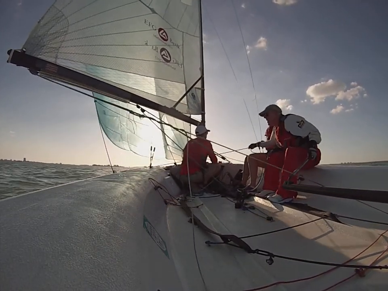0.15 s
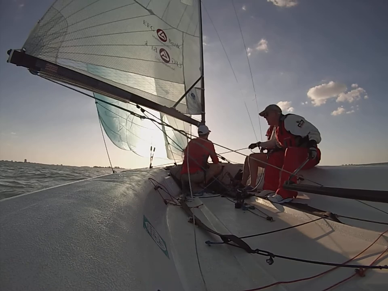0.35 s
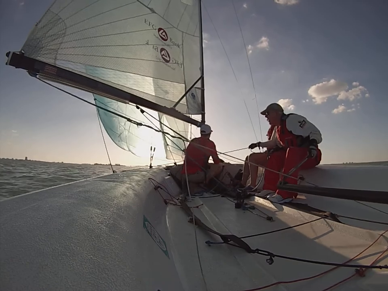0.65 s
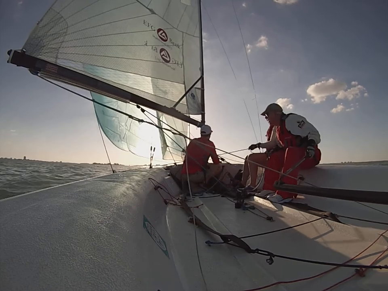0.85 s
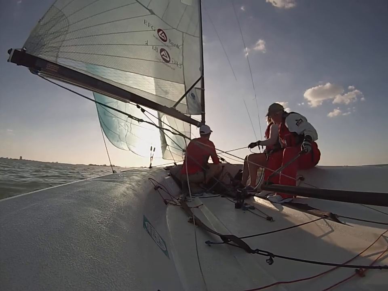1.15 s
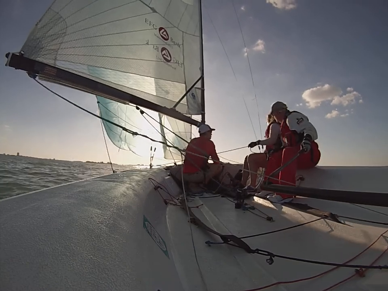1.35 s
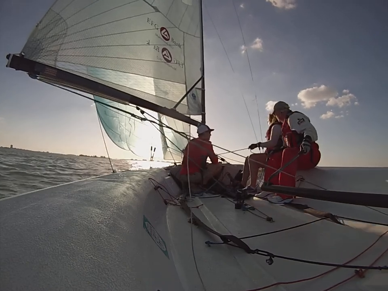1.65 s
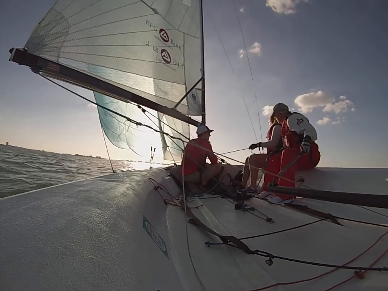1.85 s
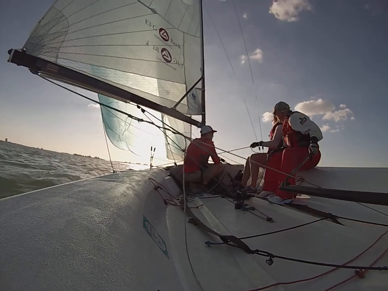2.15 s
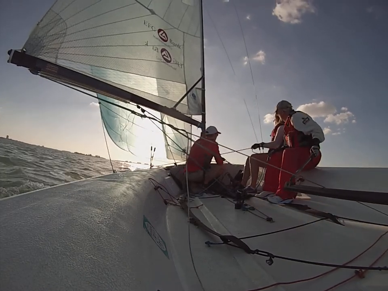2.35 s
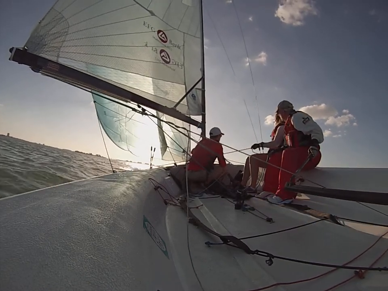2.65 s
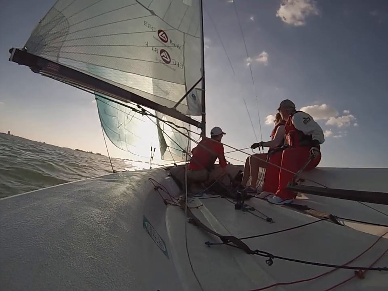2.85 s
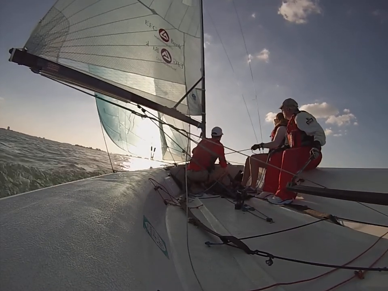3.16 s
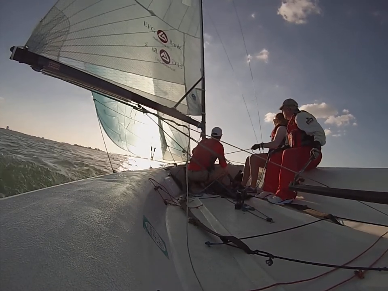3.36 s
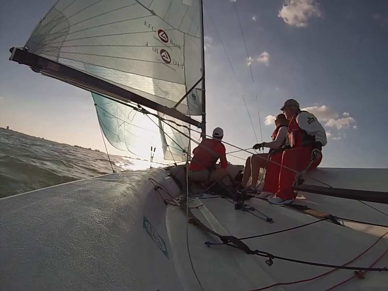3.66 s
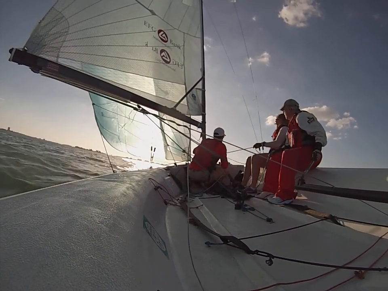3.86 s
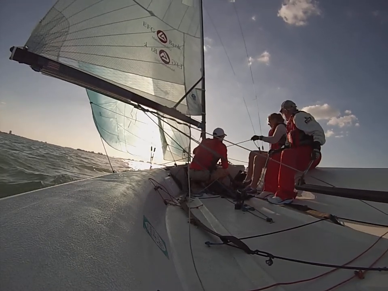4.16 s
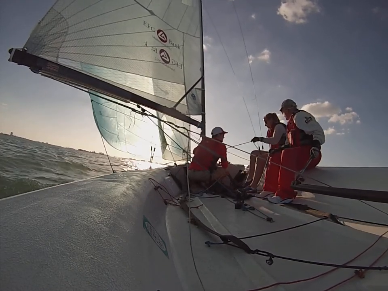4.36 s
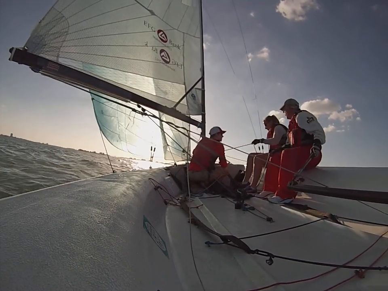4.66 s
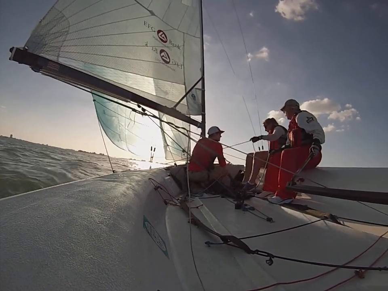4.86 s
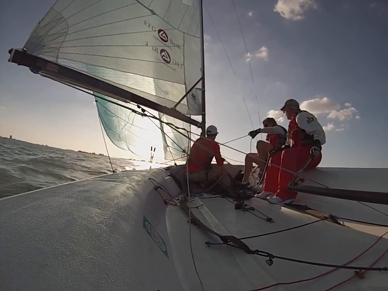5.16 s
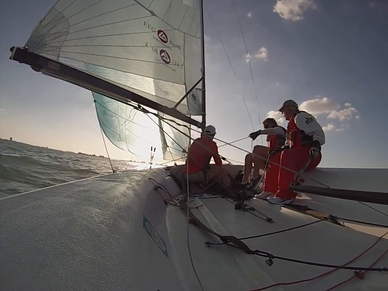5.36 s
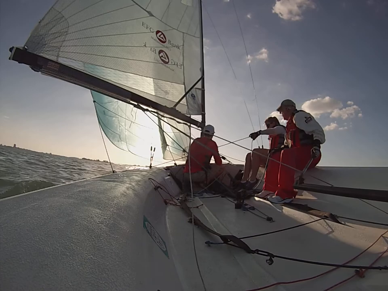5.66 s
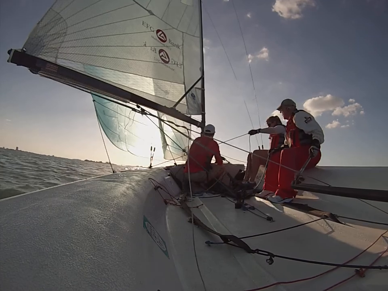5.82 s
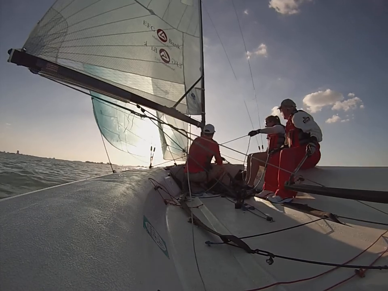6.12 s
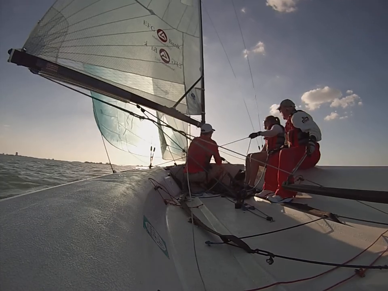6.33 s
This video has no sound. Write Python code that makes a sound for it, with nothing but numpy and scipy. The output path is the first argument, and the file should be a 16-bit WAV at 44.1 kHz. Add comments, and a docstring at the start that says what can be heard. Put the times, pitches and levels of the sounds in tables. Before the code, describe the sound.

A closed, boxy microphone on a sailboat's stern deck picks up low hollow hull booms, gurgling wake and fine spray. Bubbles plop throughout. Slaps are gentle at first, then sharper with hard knocks from just after two seconds and a heavy slap with thumps past three. Wind rumble peaks shortly after five seconds, followed by another thump and a bright, crisp slap at six.

```python
"""A small sailboat runs through choppy water, heard from a closed case mounted on its stern deck.
From the start the hull hums (noise in its modes) and booms (a wandering sine); water gurgles and rushes past,
spray ticks (bubble rings, noise), bubbles plop (sagging notes), and wind rumbles in gusts (coloured noise).
Slaps (bursts of noise and grains), drops (pinged noise) and two faint squeaks (wavering tones) join in; knocks
(struck panel modes) land from 2.2 s, thumps (pushed hull modes) from 3.3 s, and the strongest gust at 5.3 s."""
import sys
import numpy as np
from scipy import signal
from scipy.fft import rfft, irfft, next_fast_len
from scipy.io import wavfile
from scipy.ndimage import uniform_filter1d

SR = 44100
rng = np.random.default_rng(int(sys.argv[2]) if len(sys.argv) > 2 else 0)


def unload_wav(signal):
    """Save mono or channel-first audio to the path in sys.argv[1] as 16-bit WAV at rate SR, clipped to [-1, 1]."""
    wavfile.write(
        sys.argv[1],
        SR,
        np.round(np.clip(np.atleast_2d(signal).T, -1, 1) * 32767).astype(np.int16),
    )


N = 286209
TIME = np.arange(N) / SR

# hull modes: pitch_hz, width_hz, relative level_db
HULL_MODES = [(46.5, 37, -17), (101, 49, -10), (122, 16.6, 3.5), (133.3, 14, -7), (177, 37, -19)]
# waves passing under the hull: crest_s, half_length_s, gurgle_db
PASSING_WAVES = [(.898, 0.17, -52), (1.46, 0.2, -46.5), (1.896, 0.22, -44.5), (2.539, 0.45, -50),
                 (3.278, 0.19, -48.5), (4.21, 0.28, -50), (4.674, 0.36, -43), (5.236, 0.065, -43),
                 (5.518, 0.067, -45.5), (5.838, 0.21, -42.5), (6.288, 0.23, -46)]
CALM_GURGLE_DB = -51  # between the waves


def from_db(db):
    """Decibels to gain."""
    return 10 ** (np.asarray(db) / 20)


def rms_one(x):
    """Scale to rms 1."""
    return x / np.sqrt(np.mean(x ** 2) + 1e-20)


def in_time(rows):
    """The columns of a curve table at every sample."""
    s, *columns = np.transpose(rows)
    return [np.interp(TIME, s, column) for column in columns]


def drift(corner_hz):
    """Slow random wander of rms 1: noise through two equal poles."""
    step = 40  # samples per slow sample
    r = np.exp(-2 * np.pi * corner_hz * step / SR)
    noise = rng.standard_normal(N // step + 2002)
    slow = signal.lfilter([1], [1, -2 * r, r * r], noise)[2000:]  # settled part
    return np.interp(np.arange(N) / step, np.arange(len(slow)), rms_one(slow))


def band(x, low_hz, high_hz, order=2):
    """Causal band-pass."""
    high_hz = np.clip(high_hz, low_hz + 10, SR / 2 - 10)
    sos = signal.butter(order, [low_hz, high_hz], "band", fs=SR, output="sos")
    return signal.sosfilt(sos, x + 1e-18)


def ring(clicks, hz, t60_s):
    """A unit click sets a decaying sine of initial height 1 ringing."""
    r = np.exp(-np.log(1000) / (t60_s * SR))
    w = 2 * np.pi * hz / SR
    return signal.lfilter([0, np.sin(w)], [1, -2 * r * np.cos(w), r * r], clicks + 1e-18)


def resonate(x, hz, width_hz):
    """A resonance with gain 1 on top."""
    r = np.exp(-np.pi * width_hz / SR)
    zeros = np.array([1, 0, -1]) * (1 - r * r) / 2
    poles = [1, -2 * r * np.cos(2 * np.pi * hz / SR), r * r]
    return signal.lfilter(zeros, poles, x + 1e-18)


def colour(x, spectrum):
    """Impose a spectrum, interpolated over log frequency."""
    hz, db = np.transpose(spectrum)
    size = next_fast_len(N)
    bins_hz = np.maximum(np.fft.rfftfreq(size, 1 / SR), 1)
    gain = from_db(np.interp(np.log(bins_hz), np.log(hz), db, -100, -100))
    return irfft(rfft(x, size) * gain, size)[:N]


def case(x):
    """The walls of the case stress their resonances and thin out the hollows between."""
    # pitch_hz, width_hz (before scaling by boost), boost_db (negative: hollow)
    case_modes = [(795, 85, 6), (1178, 70, 8), (1270, 70, -3), (1440, 260, 4), (1660, 110, -3),
                  (1915, 170, 8.5), (2190, 110, -4), (2335, 80, 6), (2490, 70, -3), (2610, 80, 5),
                  (2980, 130, 6), (3490, 100, 4), (3980, 200, 4), (5100, 400, 4), (6620, 380, 5)]
    for hz, width_hz, boost_db in case_modes:
        x = x + (from_db(boost_db) - 1) * resonate(x, hz, width_hz / from_db(boost_db / 2))
    return x


def grains(per_s, spread_db):
    """Random clicks of either sign, many small and few large."""
    at = np.flatnonzero(rng.random(N) < per_s / SR)
    size_db = spread_db * np.minimum(rng.exponential(1, len(at)), 4)
    clicks = np.zeros(N)
    clicks[at] = from_db(size_db) * rng.choice([-1, 1], len(at))
    return clicks


def bubbles(clicks, low_hz, high_hz, cycles, count=24):
    """Each click rings a bubble of random size, for a set number of cycles to -60 dB; rms 1."""
    size_class = rng.integers(0, count, N)
    out = np.zeros(N)
    for k, hz in enumerate(np.geomspace(low_hz, high_hz, count)):
        out += np.sqrt(hz) * ring(clicks * (size_class == k), hz, cycles / hz)
    return rms_one(out)


def swell(crest_s, rise_s, decay_s):
    """A rounded rise to 1 and an exponential fall."""
    t = TIME - crest_s
    return np.exp(-np.minimum(np.where(t < 0, (t / rise_s) ** 2, t / decay_s), 40))


def crests(calm_db, rows):
    """Gain: a calm level, plus in power a rounded hump per (crest_s, half_length_s, level_db)."""
    power = from_db(calm_db) ** 2
    for s, half_s, db in rows:
        power = power + from_db(db) ** 2 * np.exp(-2 * ((TIME - s) / half_s) ** 2)
    return np.sqrt(power)


def blips(rows, sag=0.028):
    """Air pockets pinch off: each a short note that swells, sags in pitch and dies."""
    out = np.zeros(N)
    for s, hz, peak_db, length_s in rows:
        first = max(int((s - length_s) * SR), 0)
        last = min(int((s + 6 * length_s) * SR), N)
        at = np.arange(first, last)
        age = (at / SR - s) / length_s
        phase = 2 * np.pi * np.cumsum(hz * (1 - sag * np.tanh(age))) / SR
        shape = np.exp(-np.where(age < 0, (2.7 * age) ** 2, np.hypot(age, .5) - .5))
        out[at] += from_db(peak_db) * np.sin(phase) * shape
    return out


def wake_blips(per_s, spread_db, length_s):
    """Blips at random times, 850-3060 Hz, of 0.5-1.5 times the given length; rms 1."""
    when, pitch, size, length = rng.random((int(per_s * N / SR), 4)).T
    peak_s = when * N / SR
    pitch_hz = 850 * 3.6 ** pitch
    return rms_one(blips(np.column_stack([peak_s, pitch_hz, spread_db * size, length_s * (.5 + length)])))


def booms():
    """Each wave swells the hull's main note, whose pitch shifts with how the hull sits in the water."""
    # crest_s, half_length_s, level_db (rms)
    boom_crests = [(0.002, 0.042, -22.5), (0.232, 0.056, -24.5), (0.332, 0.06, -21), (0.492, 0.1, -18),
                   (0.588, 0.043, -20), (0.676, 0.09, -25.5), (1.021, 0.022, -27.5), (1.163, 0.065, -29),
                   (1.27, 0.046, -29.5), (1.435, 0.018, -19.5), (1.48, 0.013, -21.5), (1.763, .022, -29.5),
                   (1.825, 0.012, -21.5), (1.884, 0.015, -25.5), (1.992, 0.02, -18), (2.268, 0.016, -25),
                   (2.367, 0.031, -25), (2.539, 0.011, -23.5), (2.632, 0.02, -25), (2.853, 0.013, -24.5),
                   (2.915, .018, -23.5), (3.02, 0.022, -26.5), (3.197, 0.0095, -26.5), (3.438, 0.045, -30),
                   (3.665, 0.017, -25), (3.773, 0.051, -27.5), (4.058, 0.048, -25.5), (4.201, 0.052, -25.5),
                   (4.273, 0.017, -21.5), (4.326, 0.021, -20), (4.546, 0.017, -18.5), (4.626, 0.026, -20.5),
                   (4.704, 0.08, -21), (4.808, 0.04, -21), (4.989, 0.047, -21.5), (5.766, 0.035, -18),
                   (5.941, 0.036, -26.5), (6, 0.048, -25.5), (6.111, 0.035, -26.5), (6.311, 0.031, -22),
                   (6.395, 0.018, -25)]
    # time_s, pitch_hz
    pitch_curve = [(0.4, 119.3), (1.4, 122), (1.85, 126.5), (2.0, 138.3), (2.25, 122), (3.75, 125.2),
                   (4.25, 118), (4.8, 123), (5.0, 128), (5.85, 132), (6.3, 122)]
    waver_hz, waver_db = 3.46, 0.5  # rms
    pitch_hz, = in_time(pitch_curve)
    phase = 2 * np.pi * np.cumsum(pitch_hz + waver_hz * drift(8.35)) / SR
    tone = np.sqrt(2) * np.sin(phase)
    return tone * crests(-np.inf, boom_crests) * from_db(waver_db * drift(17))


def thumps():
    """A wave pounding the bottom pushes the hull softly; the water damps its modes quickly."""
    # start_s, push level_db
    pounding = [(3.337, -15.5), (3.368, -19.5), (5.187, -10), (5.2271, -9.5), (5.285, -16.5), (5.315, -18),
                (5.353, -18.5), (5.80, -6.5), (5.827, -13)]
    pushes = np.zeros(N)
    for s, level_db in pounding:
        pushes[round(s * SR)] = from_db(level_db)
    # modes differ by half their tabled dB
    rung = sum(from_db(db / 2) * ring(pushes, hz, t60_s=0.056) for hz, _, db in HULL_MODES)
    return band(rung, 97, 171.6)


def drone():
    """Turbulent water keeps the hull's low modes murmuring, a little more as a wave passes."""
    calm_drone_db = -34
    follow_share = 0.83  # dB of drone per dB of gurgle swing
    hum = np.zeros(N)
    for hz, width_hz, db in HULL_MODES:
        narrow = resonate(rng.standard_normal(N), hz, width_hz)
        hum += from_db(db) * rms_one(resonate(narrow, hz, 4 * width_hz))
    # level the hum over 80 ms before the waves shape it
    strength = np.sqrt(uniform_filter1d(hum ** 2, int(.08 * SR)) + 1e-12)
    heave = crests(CALM_GURGLE_DB, PASSING_WAVES) / from_db(CALM_GURGLE_DB)
    return hum / strength * from_db(calm_drone_db) * heave ** follow_share


def water():
    """Gurgling under the stern, bubbles in the wake and fine spray, all churned by the same eddies."""
    # time_s, rush_db, spray_db (before a 1.54 dB lift)
    flow = [(0.0, -50.5, -64), (0.54, -52, -68.5), (0.96, -50.5, -65.5), (1.61, -50.5, -68.5),
            (2.49, -47.5, -65.5), (2.96, -49.5, -67.5), (3.25, -47.5, -63), (3.47, -51, -67.5),
            (3.74, -49, -66.5), (4.07, -48.5, -64), (5.46, -46.5, -65.5), (5.75, -49, -65.5),
            (6.14, -46.5, -64), (6.49, -49, -65)]
    # spectra: pitch_hz, relative level_db per Hz
    gurgle_spectrum = [(110, -39.5), (170, -5.5), (205, 5), (255, -4), (315, 5), (400, -4), (470, 0),
                       (600, -12.5), (1000, -35.5)]
    rush_spectrum = [(350, -17.5), (620, 0), (800, -1), (1000, -5.5), (1500, 1), (1950, 0.5), (2200, -4),
                     (3000, -10.5), (3600, -32.5), (7000, -51.5)]
    spray_spectrum = [(1800, -34), (3300, 0.5), (4200, 0.5), (5200, -4), (5700, -7), (8500, -7.5),
                      (10000, -12.5), (14500, -11)]
    rush_db, spray_db = in_time(flow)
    heave = crests(CALM_GURGLE_DB, PASSING_WAVES)
    eddies = drift(19.3)

    gurgle = bubbles(grains(500, spread_db=3.5), 179.0, 659, cycles=11.4)
    gurgle += from_db(15) * rng.standard_normal(N)
    gurgle = rms_one(colour(gurgle, gurgle_spectrum))

    rush = bubbles(grains(700, spread_db=1.5), 632, 3440, cycles=11)
    rush += from_db(-2.5) * wake_blips(per_s=120, spread_db=3, length_s=0.002602)
    rush += from_db(10.0) * rng.standard_normal(N)
    rush = rms_one(case(colour(rush, rush_spectrum)))

    # tick rate: about 600 per s at mean spray, rising 1.5 dB per dB
    ticks_per_s = 600 * from_db(1.5 * (spray_db - spray_db.mean()) + 4 * drift(30))
    ticks = bubbles(grains(ticks_per_s, spread_db=4.5), 3210, 10000, cycles=26)
    spray = ticks * from_db(-6.0) + rng.standard_normal(N)
    spray = rms_one(case(colour(spray, spray_spectrum)))

    return (gurgle * heave * from_db(2.94 * eddies)
            + rush * from_db(rush_db + 1.0 * eddies)
            + spray * from_db(spray_db + 1.54 + .5 * eddies))


def slaps():
    """A wave folds against the side: a bright splash of collapsing air pockets, then a lower gulp."""
    # splash crest_s, splash_db, gulp_db, splash decay_s, splash top_hz, gulp centre_hz
    folding_waves = [(.435, -44.5, -48, 0.047, 2140, 492), (1.222, -57.5, -35.5, 0.04, 910, 450),
                     (1.405, -48, -42.5, 0.085, 2370, 302), (1.985, -50, -45, 0.03, 1700, 480),
                     (2.25, -40, -58, 0.0099, 2530, 507), (2.33, -43, -62, 0.01, 2539, 500),
                     (2.40, -49, -49.5, 0.069, 1500, 477), (3.121, -42, -36.5, 0.0086, 1930, 400),
                     (3.138, -38, -33, 0.018, 1730, 320), (3.25, -47.5, -51, 0.055, 2160, 324),
                     (3.326, -42, -33.5, 0.021, 1810, 218.6), (3.357, -35, -35.5, 0.016, 2069, 402),
                     (3.651, -44.5, -47, 0.018, 1900, 388), (4.087, -46, -43.5, 0.028, 1210, 357),
                     (5.782, -42, -36, 0.022, 1960, 201), (5.945, -37.5, -42.5, 0.011, 2365, 445),
                     (6.017, -28.5, -34, 0.016, 2780, 349.2), (6.057, -46.5, -63, 0.056, 2730, 343),
                     (6.235, -39, -34.5, 0.03, 1110, 205)]
    # pitch_hz, relative level_db per Hz
    splash_spectrum = [(120, 17), (340, 9.5), (480, 6), (620, -0.5), (800, -0.5), (1000, -3.5),
                       (1400, -1.5), (1900, -1.5), (3200, -4), (9000, -26.5)]
    rise_share = 0.43  # rise time / decay time
    gulp_lag_s, gulp_stretch = 0.0043, 2.05  # trapped air sounds later and longer
    splash_low_hz = 635
    gulp_spread = 1.364  # factor below and above the centre
    pockets = bubbles(grains(1200, spread_db=4.0), 299, 3140, cycles=22)
    source = rms_one(grains(1400, spread_db=4.5)) + from_db(-10) * pockets
    source += from_db(-5) * rng.standard_normal(N)
    splash = case(colour(source, splash_spectrum))
    out = np.zeros(N)
    for crest_s, splash_db, gulp_db, decay_s, top_hz, gulp_hz in folding_waves:
        hit = swell(crest_s, rise_share * decay_s, decay_s)
        gulp_decay_s = gulp_stretch * decay_s
        gulp = swell(crest_s + gulp_lag_s, rise_share * gulp_decay_s, gulp_decay_s)
        bright = band(splash * hit, splash_low_hz, top_hz, order=4)
        low = band(splash * gulp, gulp_hz / gulp_spread, gulp_hz * gulp_spread, order=4)
        for level_db, shape, burst in (splash_db, hit, bright), (gulp_db, gulp, low):
            # match the burst's energy to its envelope's
            out += from_db(level_db) * burst * np.sqrt(np.sum(shape ** 2) / np.sum(burst ** 2))
    return out


def knocks():
    """Solid water strikes the side panels; a softer contact reaches only their low modes."""
    # start_s, blow level_db, contact hardness_hz
    strikes = [(2.244, -42, 4000), (2.323, -42, 4500), (3.147, -40, 1900), (3.3244, -28.5, 1300),
               (3.337, -22, 480), (3.352, -41, 3000), (3.3697, -27.5, 700), (6.0105, -38, 2400),
               (6.015, -32, 2400)]
    # pitch_hz, relative level_db, t60_s
    panel_modes = [(353, -3.5, 0.065), (450, -12, 0.074), (833, -1.5, 0.018), (1113, -4, 0.035),
                   (1430, -7, .015), (1800, -4, 0.063), (2410, -2, 0.015)]
    blows = np.zeros(N)
    for s, level_db, hard_hz in strikes:
        click = signal.unit_impulse(N, round(s * SR)) + 1e-18
        blows += from_db(level_db) * signal.sosfilt(signal.butter(2, hard_hz, fs=SR, output="sos"), click)
    return sum(from_db(db) * ring(blows, hz, t60_s) for hz, db, t60_s in panel_modes)


def plops():
    """Single bubbles and air pockets pinch off beside the stern; smaller ones die sooner."""
    # peak time_s, pitch_hz, peak_db
    pinches = [(.008, 1454, -31.5), (.424, 1925, -41), (.566, 1900, -39), (0.979, 1474, -37.5),
               (1.193, 540, -34), (1.218, 450, -22), (1.222, 329, -23), (1.249, 464, -28.5),
               (1.269, 345, -37), (1.303, 490, -40), (1.403, 262, -31), (1.428, 370, -35),
               (1.565, 470, -36), (1.854, 1910, -36), (1.899, 800, -36), (1.993, 1610, -38.5),
               (2.06, 1450, -40), (2.449, 474, -38), (2.498, 482, -38), (2.566, 1410, -41),
               (3.136, 375, -44), (3.166, 300, -34), (3.244, 1167, -42), (3.259, 840, -40),
               (3.296, 1590, -36.5), (3.306, 880, -41), (3.364, 770, -32), (3.396, 316, -29.5),
               (3.613, 1810, -41), (3.645, 1420, -45), (3.685, 1186, -41), (3.755, 1925, -36),
               (3.772, 1730, -45), (4.09, 474, -35.5), (4.147, 1910, -38.5), (4.374, 1440, -38.5),
               (4.492, 1590, -38), (4.52, 483, -36.5), (4.644, 463, -34.5), (4.691, 510.7, -38),
               (4.903, 1801, -37), (4.924, 1425, -40), (4.984, 1110, -40), (5.109, 1940, -36.5),
               (5.78, 1425, -36), (5.944, 1378, -33.5), (6.024, 1950, -26), (6.057, 1410, -35),
               (6.062, 1930, -33), (6.222, 765, -25), (6.236, 488.8, -31.5), (6.243, 270, -28),
               (6.259, 430, -31), (6.341, 1524, -41), (6.458, 1440, -36.5)]
    ring_s, ring_hz = .0095, 354  # ring time of a bubble of this pitch
    return blips([(s, hz, peak_db, ring_s * np.sqrt(ring_hz / hz)) for s, hz, peak_db in pinches])


def drops():
    """Each of the largest spray drops is a tiny noise splash with a short ping in it."""
    # time_s (2.4 ms before the crest), nominal level_db (before a 2.5 dB cut)
    big_drops = [(.5536, -51), (3.384, -48), (3.955, -40), (4.329, -48), (4.643, -44), (5.498, -44.5),
                 (5.6096, -46), (5.861, -41), (6.021, -43)]
    pings_hz = 3560 * (1 + 0.22 * rng.standard_normal(len(big_drops)))
    patter = rng.standard_normal(N)
    out = np.zeros(N)
    for (s, level_db), hz in zip(big_drops, pings_hz):
        splash = patter * swell(s + 0.0024, rise_s=0.00088, decay_s=0.0051)
        out += from_db(level_db - 2.5) * (0.25 * splash + 6.7 * resonate(splash, hz, 280))
    return band(out, 1100, 12000, order=4)


def squeaks():
    """A fitting in the rigging slips under load: a thin wavering tone and its octave."""
    # start_s, length_s, pitch_hz, level_db of the fundamental's peak
    slips = [(1.366, 0.1, 6570, -70), (2.932, 0.1, 6490, -65)]
    waver = 1 + 0.0068 * drift(90)
    out = np.zeros(N)
    for s, length_s, hz, level_db in slips:
        phase = 2 * np.pi * np.cumsum(hz * waver) / SR
        shape = np.sqrt(np.abs(np.sin(np.pi * np.clip((TIME - s) / length_s, 0, 1))))
        out += from_db(level_db) * shape * (np.sin(phase) + from_db(-10) * np.sin(2 * phase))
    return out


def wind():
    """A steady breeze buffets the case as low noise; each gust rises quickly and dies away."""
    # peak_s, rumble_db, decay_s
    gust_rows = [(.93, -39.5, 0.13), (1.41, -34, .06), (1.74, -31.5, 0.15), (3.44, -32, 0.03),
                 (4.25, -36, 0.23), (4.87, -31, 0.074), (5.26, -25, 0.3), (5.82, -37, .15),
                 (6.25, -31, 0.052)]
    # pitch_hz, relative level_db per Hz
    rumble_spectrum = [(10, -8.5), (20, -1), (30, 3), (42, -2), (75, -3), (100, -9.5), (170, -3.5),
                       (300, -42)]
    breeze_db, gust_rise_s = -43, 0.047
    power = from_db(breeze_db) ** 2
    for s, db, decay_s in gust_rows:
        power = power + (from_db(db) * swell(s, gust_rise_s, decay_s)) ** 2
    rumble = rms_one(colour(rng.standard_normal(N), rumble_spectrum))
    return rumble * np.sqrt(power) * from_db(1.0 * drift(9.8))


def scene():
    """Hull, water, rigging and wind at one microphone."""
    hull = booms() + thumps() + drone()
    sea = water() + slaps() + knocks() + plops() + drops()
    return (hull + sea + squeaks() + wind())[None]


def record(dry):
    """The top is cut steeply above 15.2 kHz."""
    sos = signal.ellip(10, .2, 80, 15200, fs=SR, output="sos")  # 0.2 dB ripple, 80 dB stop
    return signal.sosfilt(sos, dry)


dry = scene()
out = record(dry)
unload_wav(out)
```